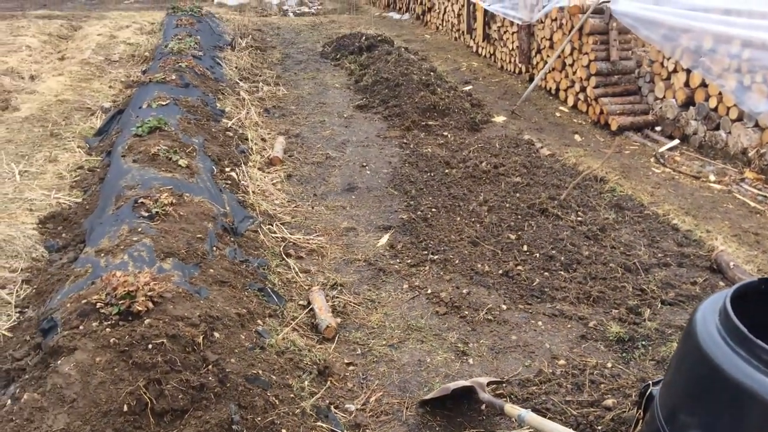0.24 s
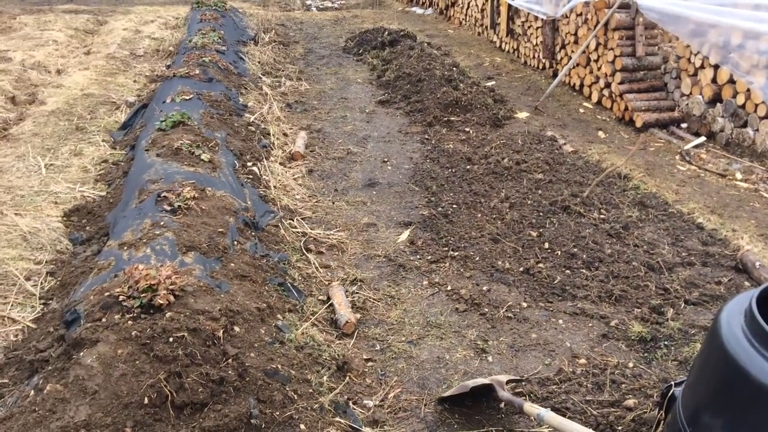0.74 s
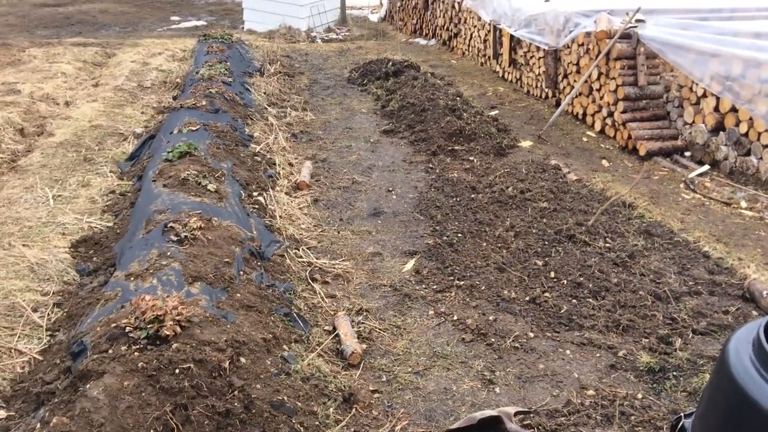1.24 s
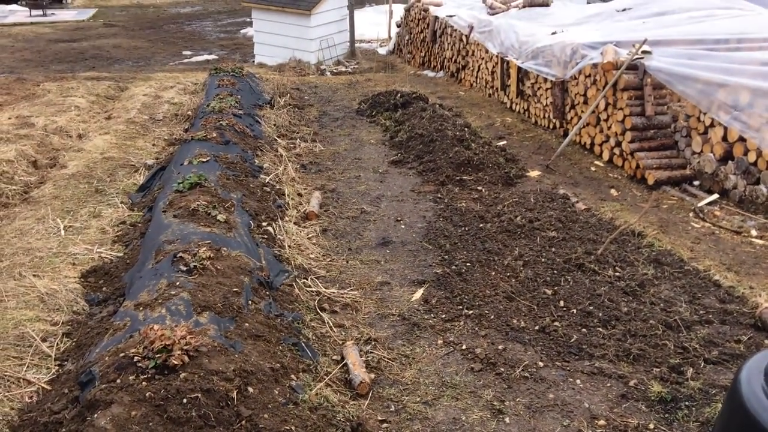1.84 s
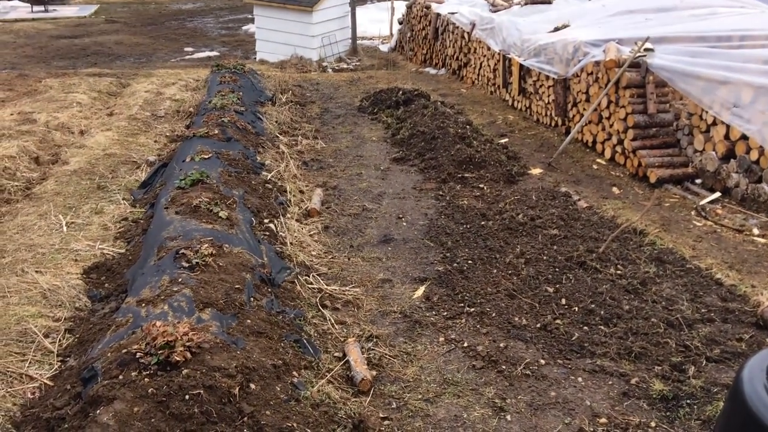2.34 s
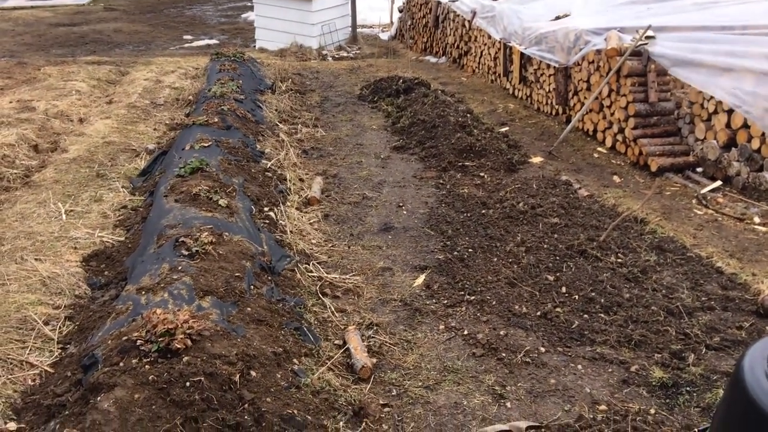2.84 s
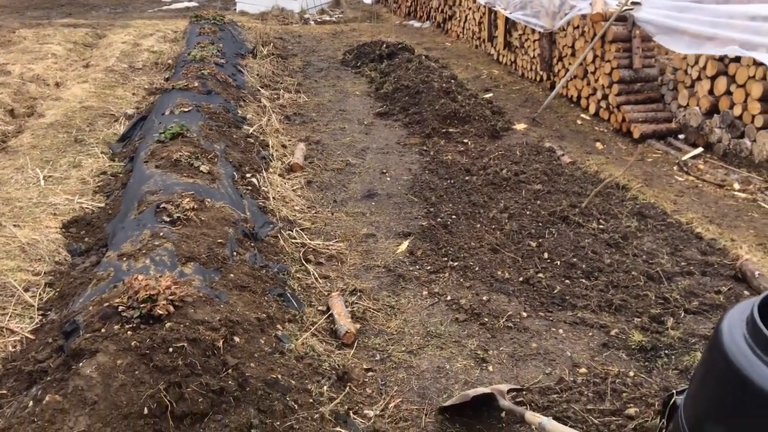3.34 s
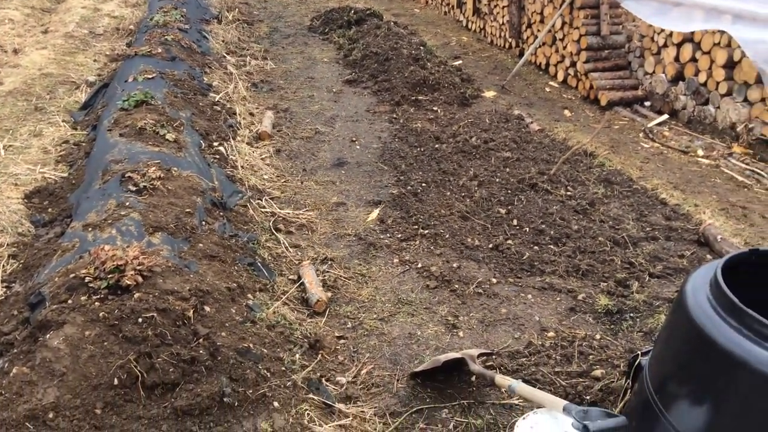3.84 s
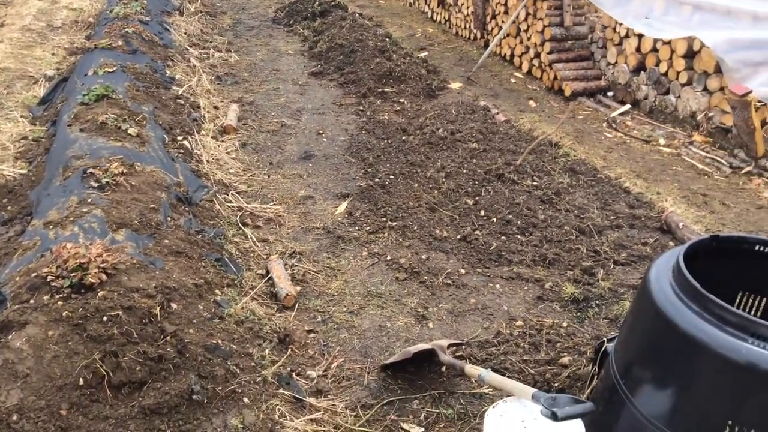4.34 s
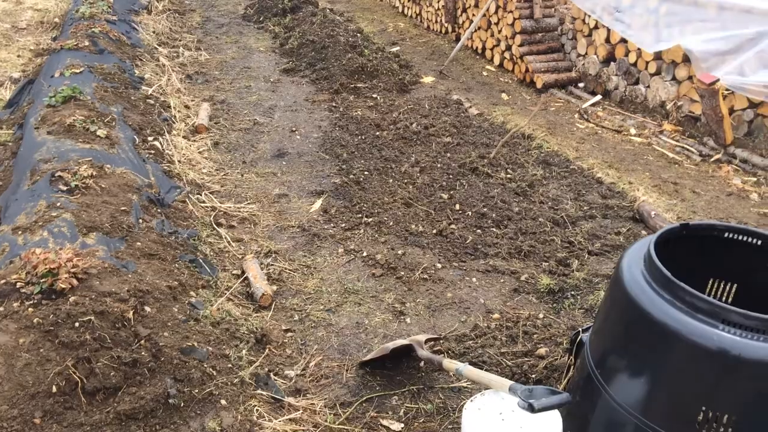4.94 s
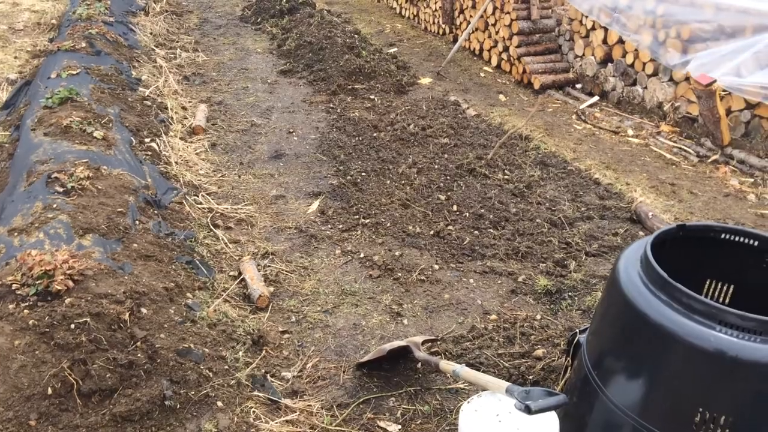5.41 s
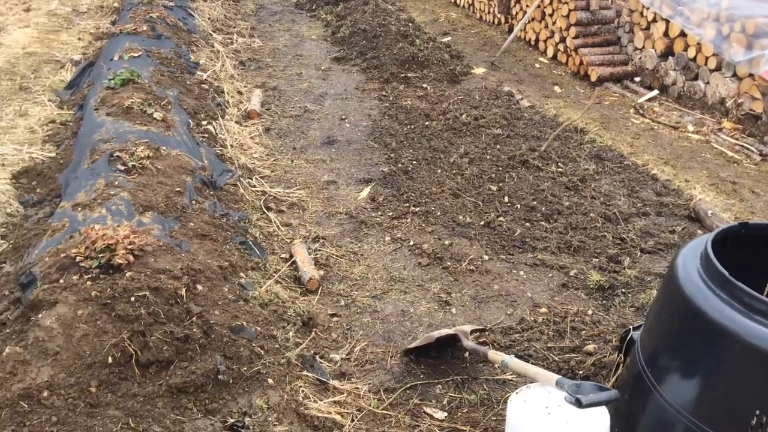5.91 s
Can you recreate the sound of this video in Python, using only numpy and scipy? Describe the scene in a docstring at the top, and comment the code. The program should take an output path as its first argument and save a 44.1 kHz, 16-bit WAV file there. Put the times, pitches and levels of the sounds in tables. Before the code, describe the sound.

A quiet open-air hush with faint hiss begins, with tiny dry ticks and a brief grass rustle. At about 0.8 s wind hits the hand-held microphone in low, lumpy thuds and flutter, with another burst near 1.4 s. It eases from 1.6 to 2.2 s, letting small dull stalk ticks through. A strong gust follows at 2.3-2.8 s, with heavy bumps and the sharpest pop at about 2.5 s. Around 3.0-3.4 s it calms to soft rumble, faint rustling and ticks. Buffeting returns near 3.6 s, where dry crackles lie underneath, then at 4.3 s. A very hard double thump lands at about 4.77 s, another at 5.1 s. Milder fluttering puffs continue around 5.5 s, dip, and rise again at 6 s to the end. Everything is close, bass-heavy and echo-free; the garden details stay far below the wind.

```python
"""Wind buffeting over a dry garden bed

Outdoors over a bare bed, puffs of wind buffet a hand-held microphone: lumpy bursts of turbulent noise
make dull, uneven thuds and flutter, and lopsided pressure spikes snap as small fast eddies cross the port.
Far below, bursts of coloured noise tick like dry stalks and clustered tiny contacts rustle like grass.
A few thin fading tones ping over steady noise: a quiet open-air hush and the microphone's hiss."""
import sys
import numpy as np
from scipy import signal
from scipy.fft import rfft, irfft
from scipy.io import wavfile

SR = 44100
rng = np.random.default_rng(int(sys.argv[2]) if len(sys.argv) > 2 else 0)


def transcribe(signal):
    """Save signal, clipped to [-1, 1], as a 16-bit WAV file at the path in sys.argv[1]."""
    frames = np.atleast_2d(signal).T
    limited = np.clip(frames, -1, 1)
    pcm = np.round(limited * 32767).astype(np.int16)
    wavfile.write(sys.argv[1], SR, pcm)


N = 272097  # length of the scene in samples

# crisp noise of cracking stalks and sliding blades: (frequency [Hz], relative level [dB])
CRISP_EDGE = [(1500, -13), (3500, -1), (6500, -5.5), (10000, -10.5), (15000, -9)]


def undb(db):
    """Decibels to gain."""
    return 10 ** (np.asarray(db) / 20)


def unit(x):
    """Scale to rms 1."""
    return x / np.sqrt(np.mean(x ** 2))


def add(out, sound, start_s):
    """Mix a sound in from a given time, trimmed to the scene."""
    start = int(round(start_s * SR))
    first, last = max(start, 0), min(start + len(sound), N)
    out[first:last] += sound[first - start:last - start]


def colour(x, points):
    """Filter by a spectrum of (frequency [Hz], level [dB]) points, joined on a log frequency axis."""
    hz, db = np.transpose(points)
    f = np.fft.rfftfreq(len(x), 1 / SR)
    gain = undb(np.interp(np.log(f + 1), np.log(hz), db))
    return irfft(rfft(x) * gain, len(x))


def swell(peak_s, db, rise_s, fall_s):
    """A rounded rise and fall of gain; it is a quarter of its peak rise_s before and fall_s after."""
    t = np.arange(N) / SR - peak_s
    distance = np.abs(t) / np.where(t < 0, rise_s, fall_s)
    return undb(db) * 2 ** (-2 * np.minimum(distance, 5) ** 2)


def together(gains):
    """Gain of several unrelated swells: their powers add."""
    return np.sqrt(sum(gain ** 2 for gain in gains))


def db_at(gain, s):
    """Level of a gain curve at a given time."""
    return 20 * np.log10(gain[int(np.clip(s * SR, 0, N - 1))] + 1e-9)


def turbulence(x, edge_hz, low_cut_hz=55, roll=1.053):
    """Pressure spectrum of turbulence: small eddies die out exponentially; the microphone drops the deepest bass."""
    f = np.fft.rfftfreq(len(x), 1 / SR)
    rise = (f / low_cut_hz) ** 3
    low_cut = rise / np.hypot(1, rise)
    eddy_loss = undb(-20 * (f / edge_hz) ** roll)  # 20 dB down at edge_hz
    return irfft(rfft(x) * low_cut * eddy_loss, len(x))


def buffets(flow, uneven_db=4.5, lump_s=0.0062, size=8192):
    """Each puff swells and dies as a lumpy bunch of eddies; faster air reaches higher."""
    # strongest puffs on the microphone, before the port colours them; the length runs from peak to a quarter:
    # (time [s], level [dB], length [s], frequency where small eddies are 20 dB down [Hz])
    strong_puffs = [(0.049, -36.5, 0.035, 177), (0.83, -25.5, 0.027, 398), (.865, -26, 0.02, 460),
                    (0.912, -28, 0.032, 393), (1.021, -30, 0.032, 460), (1.142, -33, 0.011, 219.5),
                    (1.303, -30, 0.045, 352), (1.424, -23.5, 0.032, 620), (1.562, -36.5, 0.057, 183),
                    (1.825, -28.5, 0.0087, 262), (1.907, -35, 0.031, 224), (1.999, -29.5, .013, 282),
                    (2.197, -28, .012, 195), (2.238, -34, .011, 394), (2.333, -17, .015, 389.5),
                    (2.409, -25, 0.019, 523), (2.488, -23.5, 0.009, 381.5), (2.527, -17, 0.019, 758),
                    (2.561, -23.5, 0.025, 522.5), (2.632, -28, 0.015, 526), (2.756, -23, 0.018, 742),
                    (2.784, -27.5, 0.033, 379), (2.846, -34, .01, 507), (3.019, -30.5, 0.0052, 256),
                    (3.374, -30.5, 0.022, 509), (3.467, -25.5, 0.0076, 288), (3.5, -23, 0.0092, 377),
                    (3.618, -23, 0.036, 600), (3.763, -30, 0.019, 422), (4.096, -27.5, 0.032, 423),
                    (4.155, -27.5, 0.035, 228), (4.336, -24, 0.037, 493), (4.444, -30, 0.014, 451),
                    (4.54, -27.5, .021, 390), (4.625, -27, 0.011, 399), (4.748, -18.5, 0.0074, 448.5),
                    (4.772, -14.5, 0.028, 514.5), (4.857, -25, 0.0083, 398), (4.933, -23.5, 0.048, 456.5),
                    (5.109, -17.5, 0.016, 423.5), (5.169, -23, .025, 286), (5.398, -29.5, 0.018, 359),
                    (5.441, -29.5, 0.017, 600), (5.569, -25.5, 0.035, 427), (5.843, -32, 0.015, 352),
                    (5.945, -29.5, 0.013, 487)]
    out = np.zeros(N)
    t = (np.arange(size) - size / 2) / SR
    for s, db, length_s, edge_hz in strong_puffs + flutter(flow):
        air, chance = rng.standard_normal((2, size))
        if s * SR >= N:
            continue
        shape = 2 ** (-2 * (t / length_s) ** 2)
        lumps_db = uneven_db * np.interp((t - t[0]) / lump_s, np.arange(size), chance)
        puff = turbulence(air * undb(lumps_db) * shape, edge_hz)
        # rescale so that the level holds over the puff itself, not the whole buffer
        puff_gain = np.sqrt(np.mean(shape ** 2)) * undb(db)
        add(out, unit(puff) * puff_gain, s + t[0])
    return out


def flutter(flow, count=220):
    """Lesser puffs follow each other unevenly; stronger flow makes them louder and brighter. Rows as in buffets."""
    gap_s, length_s, jitter = .034, .011, .5  # jitter in gaps
    over_flow_db, scatter_db = 1.57, 2.5
    # brightness: the edge at the typical level, and the power of the puff's strength that moves it
    typical_edge_hz, typical_db, edge_power = 475, -29.5, 0.58
    rows = []
    for k, (late, strength) in enumerate(rng.uniform(-0.958, 1, (count, 2))):
        s = (k + jitter * late) * gap_s
        db = db_at(flow, s) + over_flow_db + scatter_db * strength
        edge_hz = max(typical_edge_hz * undb(edge_power * (db - typical_db)), 100)
        rows.append((s, db, length_s, edge_hz))
    return rows


def vortices(sharpness=4.15, size=8192):
    """A lone vortex passes: its pressure is a brief, lopsided spike, narrower the higher its pitch."""
    # single hard vortices: (time [s], peak level before the random lean [dB], pitch [Hz])
    hard_snaps = [(.8636, -15, 300), (.9077, -17, 260), (1.4072, -20, 360), (1.4223, -22, 420),
                  (2.3330, -11, 290), (2.3806, -20, 390), (2.5146, -3.5, 790), (2.5253, -17, 950),
                  (2.5309, -7, 440), (2.6256, -25, 410), (2.7532, -13, 540), (3.5970, -15, 55),
                  (3.6043, -14, 300), (3.6190, -13, 380), (4.0831, -16, 360), (4.3295, -18, 320),
                  (4.7700, -13, 640), (4.7722, -5, 360), (5.1109, -19, 250), (5.5690, -17, 290),
                  (5.6001, -22, 350), (6.0245, -16, 330), (6.0586, -16, 370)]
    out = np.zeros(N)
    t = (np.arange(size) - size / 2) / SR
    for s, db, hz in hard_snaps:
        # the pressure falls off as a power of the distance to the core
        spike = (1 - 2j * np.pi * hz * t / sharpness) ** -(sharpness + 1)
        lean = np.exp(1j * rng.standard_normal() / 2)  # random phase skews the spike
        add(out, -undb(db) * (spike * lean).real, s + t[0])
    return out


def breeze(flow, reach_hz=290, under_flow_db=-6.5):
    """Smooth, slow air keeps the port rumbling softly between puffs."""
    rumble = unit(turbulence(rng.standard_normal(N), reach_hz))
    return rumble * flow * undb(under_flow_db)


def stalks(rustle, snap_s=0.0035, settle_s=0.028, settle_db=-15, level_db=-2.0, size=8192):
    """A dry stalk cracks and its fibres settle: fast and slow decays of noise; some are crisper."""
    # clearest ticks of stalks and crumbs, before the common level_db:
    # (time [s], level [dB], crisp treble relative to it [dB])
    clear_ticks = [(0.037, -58, -28), (0.183, -57.5, -8), (.667, -54, -14), (1.054, -49, -24),
                   (1.669, -45.5, -32), (1.919, -55.5, -11), (2.088, -56.5, -14), (2.402, -65, 7.5),
                   (2.59, -46, -36.5), (2.765, -67.5, 4), (3.195, -62, 4), (3.328, -48, -28),
                   (3.401, -49.5, -28), (3.642, -52, -19), (3.696, -44.5, -18), (3.818, -50.5, -25),
                   (3.871, -43.5, -14), (4.059, -54.5, -15.5), (4.145, -53, -27), (4.957, -56, -10),
                   (5.426, -54.5, -7), (5.664, -44.5, -15)]
    # body of a crack: (frequency [Hz], relative level [dB])
    crack_colour = [(300, -12), (700, -0.5), (1400, 1), (2200, -1.5), (3200, -8.5), (5000, -31.5),
                    (15000, -43.5)]
    out = np.zeros(N)
    t = np.arange(size) / SR
    decay = np.exp(-t / snap_s) + undb(settle_db) * np.exp(-t / settle_s)
    for s, db, crisp_db in clear_ticks + faint_ticks(rustle):
        body, fibres = rng.standard_normal((2, size))
        tick = unit(colour(body, crack_colour)) + undb(crisp_db) * unit(colour(fibres, CRISP_EDGE))
        add(out, tick * decay * undb(db + level_db), s)
    return out


def faint_ticks(rustle, count=30, over_rustle_db=5, crisp_db=-8.5):
    """Small stalks give way at random, as loud as the moving grass makes them. Rows as in stalks."""
    times_s = rng.random(count) * N / SR
    return [(s, db_at(rustle, s) + over_rustle_db, crisp_db) for s in times_s]


def grass(rustle, crisp, touches_per_s=1700, bigger_db=3.5, cluster_db=2.5, cluster_s=.014):
    """Many tiny contacts of dry blades come in short clusters, a few larger than the rest."""
    # colour of the contacts: (frequency [Hz], relative level [dB])
    blade_colour = [(300, -13), (700, 8), (1300, 3), (2200, -4), (3500, -15.5), (7000, -25), (15000, -39.5)]
    contacts = (rng.random(N) < touches_per_s / SR) * np.sign(rng.standard_normal(N))
    sizes = undb(bigger_db * np.minimum(rng.exponential(size=N), 5))
    cluster_steps = np.arange(N) / SR / cluster_s
    clusters = undb(cluster_db * np.interp(cluster_steps, np.arange(N), rng.standard_normal(N)))
    touching = unit(colour(contacts * sizes * clusters, blade_colour))
    sliding = unit(colour(rng.standard_normal(N), CRISP_EDGE))  # blades that slide along each other hiss
    return touching * rustle + sliding * crisp


def pings(size=8192):
    """A few faint, thin sine tones that start at once and fade exponentially."""
    # (time [s], pitch [Hz], starting level [dB], fading time [s])
    thin_tones = [(0.18, 1395, -45.5, 0.004), (1.582, 6630, -67.5, 0.033), (4.76, 7580, -83, 0.032)]
    out = np.zeros(N)
    t = np.arange(size) / SR
    for s, hz, db, fade_s in thin_tones:
        add(out, undb(db) * np.sin(2 * np.pi * hz * t) * np.exp(-t / fade_s), s)
    return out


def open_air(hush_db=-60.5, hiss_db=-75.5):
    """Distant outdoor hush and the microphone's own even hiss, both steady coloured noise."""
    # colour of the distance: (frequency [Hz], relative level [dB])
    hush_colour = [(25, -10), (60, 0), (125, -6), (250, -14), (480, -18), (850, -15), (1400, -23),
                   (2500, -36), (6000, -60)]
    # colour of the microphone hiss: (frequency [Hz], relative level [dB])
    hiss_colour = [(500, -13.5), (3000, 5), (6000, 0), (15000, -3.5)]
    far, own = rng.standard_normal((2, N))
    hush = unit(colour(far, hush_colour)) * undb(hush_db)
    hiss = unit(colour(own, hiss_colour)) * undb(hiss_db)
    return hush + hiss


def scene():
    """Wind on the microphone over the quiet garden; the open ground gives no echo."""
    # gusts, each swelling and dying away: (peak time [s], level [dB], rise [s], fall [s])
    gusts = [(.87, -31.5, 0.085, 0.27), (1.36, -37, .08, 0.18), (1.94, -51, 0.083, 0.048),
             (2.41, -30, 0.18, 0.41), (3.09, -41.5, 0.28, 0.14), (3.621, -28.5, 0.17, 0.16),
             (3.919, -37, 0.17, 0.099), (4.391, -31.5, 0.044, 0.098), (4.9, -32.5, 0.23, 0.21),
             (5.54, -34.5, 0.1, .2), (6.052, -27, 0.19, 0.12)]
    # light air that keeps moving between the later gusts: (peak time [s], level [dB], rise [s], fall [s])
    light_air = (2, -49, 0.1, 7.4)
    # swishes of dry grass:
    # (peak time [s], level [dB], rise [s], fall [s], crisp treble relative to it [dB])
    swishes = [(0.041, -57, 0.057, 0.029, -30), (1.3, -67, 0.17, 0.33, -26),
               (1.67, -68.5, 0.18, 0.045, -15), (2.1, -71.5, 0.46, 0.81, -14),
               (2.65, -72.5, 0.25, 0.14, -3.5), (3.2, -64, 0.19, 0.097, -11),
               (3.361, -59.5, 0.14, 0.15, -30.5), (3.681, -61, 0.2, 0.16, -32),
               (3.95, -61.5, 0.058, 0.13, -22), (4.2, -66.5, 0.14, 0.12, -6.5),
               (5.502, -68.5, 0.23, 0.27, -23), (6.15, -68.5, 0.099, .1, -16)]
    # colour of the microphone port under wind: (frequency [Hz], level [dB])
    port_colour = [(40, -3.5), (95, 1), (170, 1), (280, -4), (460, 3), (700, -2.5), (950, -7), (2000, 0.5)]
    flow = together(swell(*gust) for gust in gusts + [light_air])
    swish_gains = [(swell(*shape), crisp_db) for *shape, crisp_db in swishes]
    rustle = together(gain for gain, _ in swish_gains)
    crisp = together(gain * undb(crisp_db) for gain, crisp_db in swish_gains)
    wind = colour(buffets(flow) + breeze(flow), port_colour) + vortices()
    garden = stalks(rustle) + grass(rustle, crisp) + pings() + open_air()
    return (wind + garden)[None]


def record(dry, top_hz=15300, fade_s=.004):
    """The sound fades in and out within a few milliseconds, and a steep low-pass cuts the top, where the
    recorder's treble ends."""
    to_nearest_end = np.minimum(np.arange(N), np.arange(N)[::-1])
    fade = np.minimum(1, to_nearest_end / (fade_s * SR))
    low_pass = signal.ellip(10, .1, 70, top_hz, fs=SR, output="sos")
    return signal.sosfilt(low_pass, dry * np.sin(np.pi / 2 * fade) ** 2)


dry = scene()
out = record(dry)
transcribe(out)
```